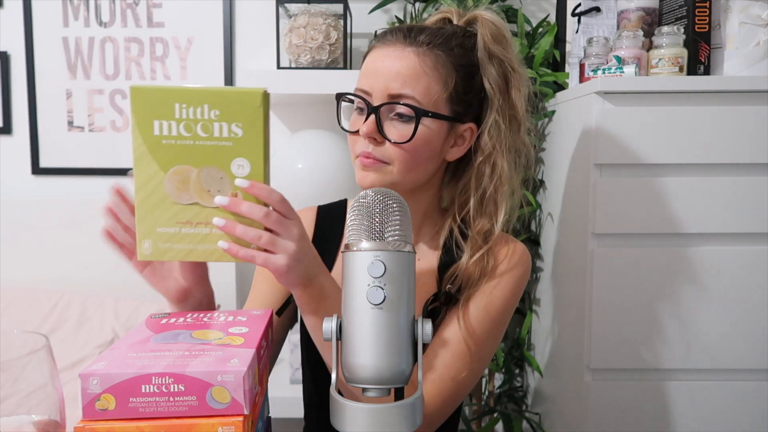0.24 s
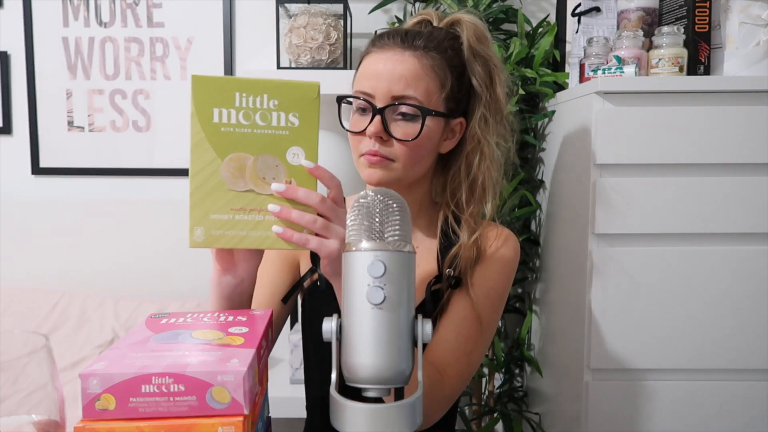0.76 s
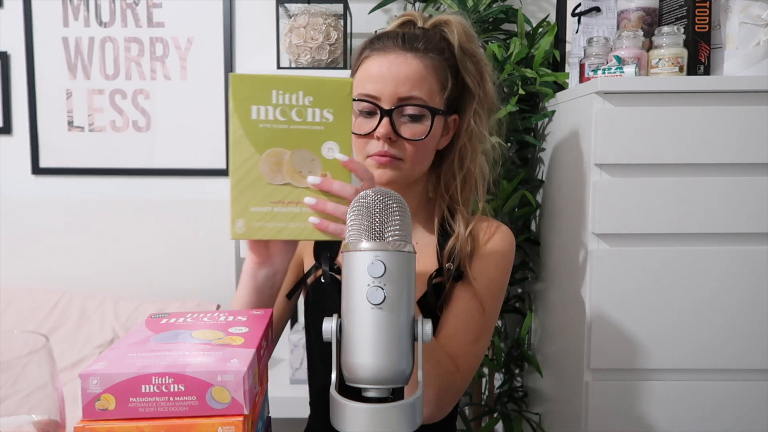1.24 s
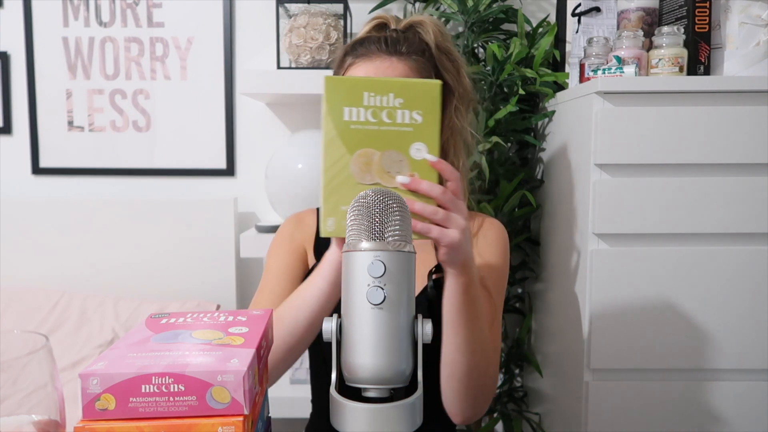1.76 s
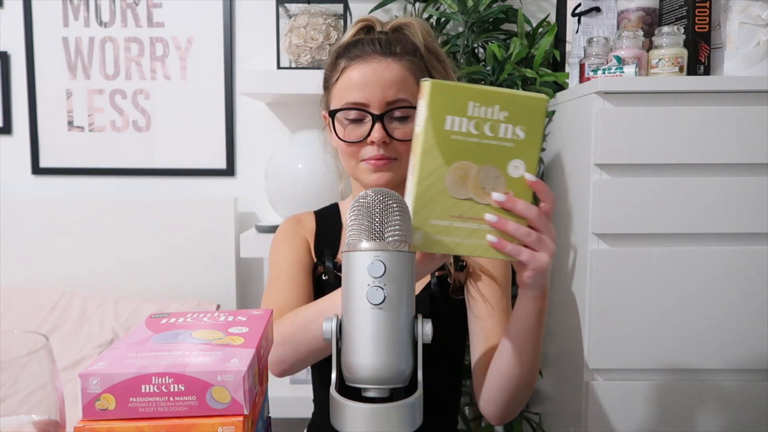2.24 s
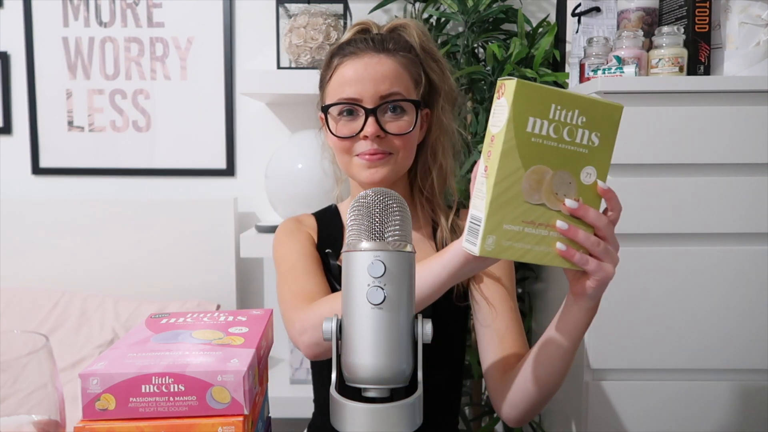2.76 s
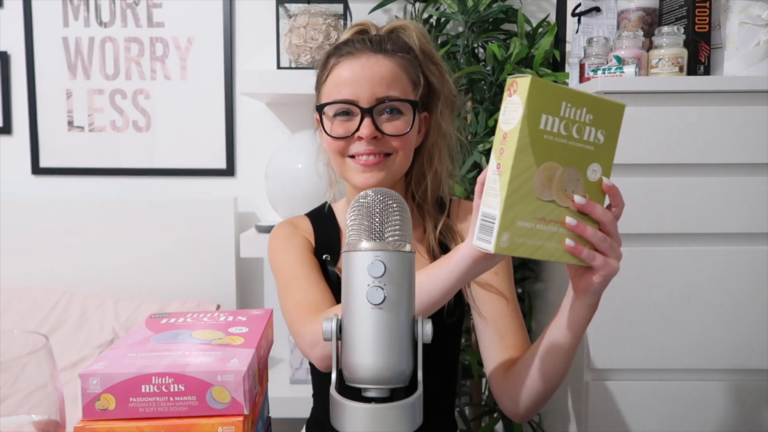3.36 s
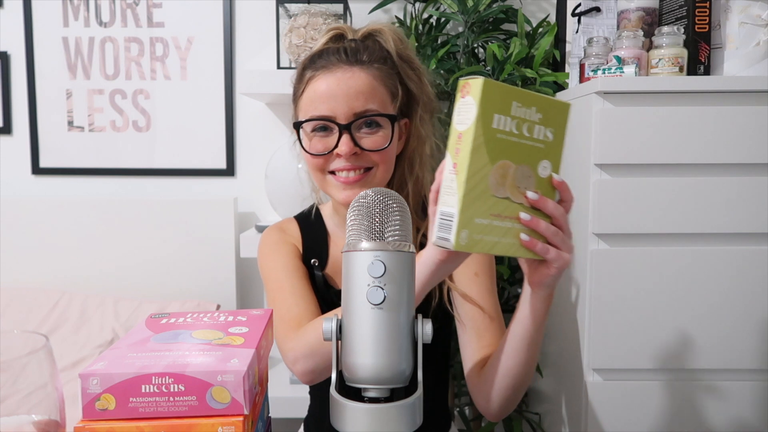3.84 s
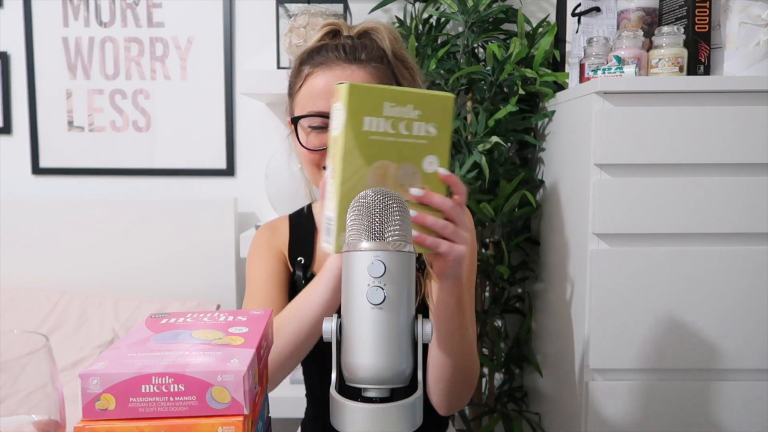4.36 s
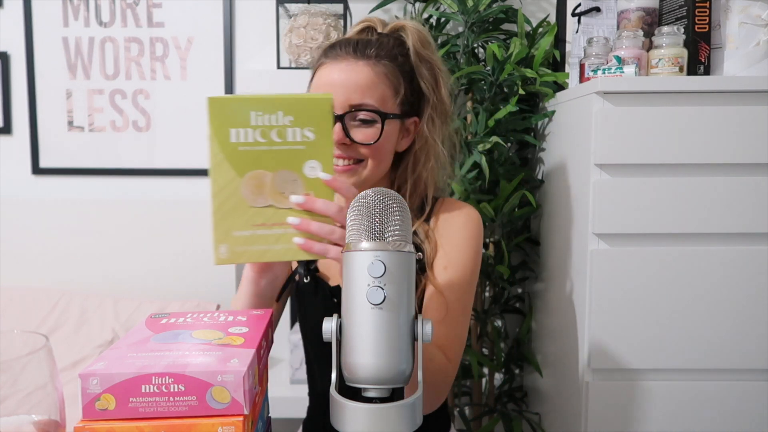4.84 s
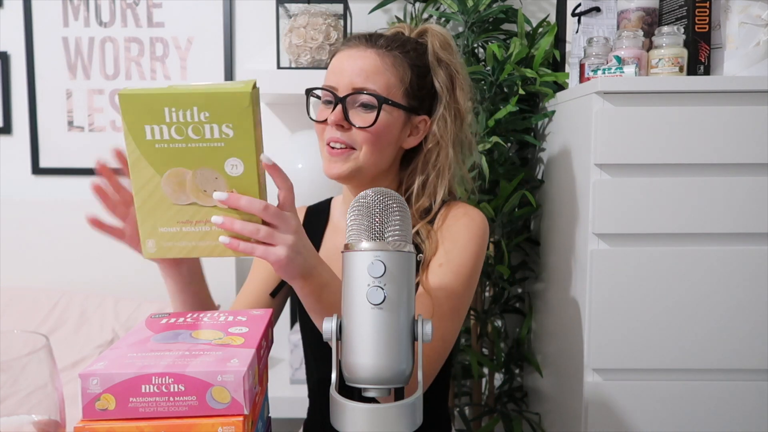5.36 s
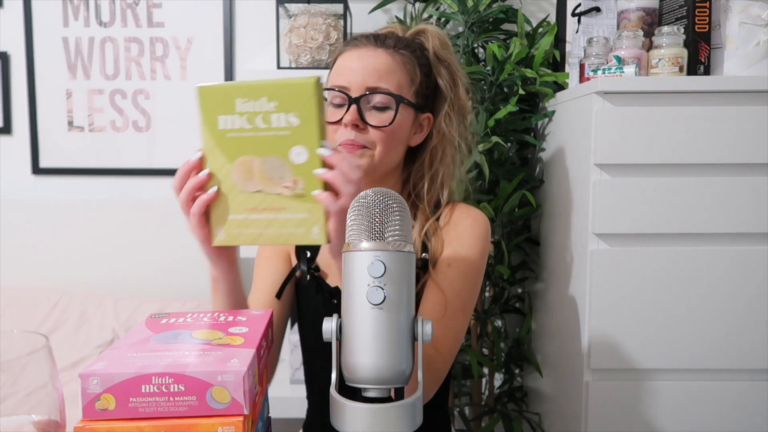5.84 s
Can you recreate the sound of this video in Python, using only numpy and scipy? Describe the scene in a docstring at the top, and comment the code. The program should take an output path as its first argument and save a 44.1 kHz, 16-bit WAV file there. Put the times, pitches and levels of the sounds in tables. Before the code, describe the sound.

Close-up nail tapping on a light cardboard box: faint handling first, then repeated rapid clicking rolls with short pauses, ending in soft shuffling.

```python
"""A small soft room, where long fingernails drum in quick rolls on a thin cardboard box near a microphone.
Each tap is a short noise tick over four families of decaying modes: face, edge, hollow and thump.
Before, between and after rolls the fingers shift their grip and rub the card: jerky noise, dull and bright.
Near echoes and a decaying noise tail make the room; air hiss, a faint hum and a low rumble lie under it.
"""
import sys
import numpy as np
from scipy import signal
from scipy.fft import rfft, irfft
from scipy.io import wavfile

SR = 44100
rng = np.random.default_rng(int(sys.argv[2]) if len(sys.argv) > 2 else 0)


def dump_mix(stems):
    """Bounce the given channels to the path in sys.argv[1] as a 16-bit WAV at rate SR."""
    frames = np.atleast_2d(stems).T  # one column per channel
    limited = np.clip(frames, -1, 1)  # hard clip at full scale
    pcm = np.round(limited * 32767).astype(np.int16)
    wavfile.write(sys.argv[1], SR, pcm)


N = 269451  # length in samples

# Nail taps and grip knocks: start_s, face_level_db, face_pitch_hz (nearest the struck spot),
# edge_level_db and hollow_level_db (both against the face ring), hollow_pitch_hz
BLOWS = [(0.013, -43, 650, -12, 1.5, 307), (0.121, -38.5, 730, -16, -5, 417), (0.16, -36, 610, 0, -21, 444),
         (0.224, -38.5, 1040, -16, -2, 458), (0.236, -31.5, 685, -5, -2.5, 377),
         (0.269, -42, 511, -5, -7, 468), (0.424, -41, 670, -9, -11, 439), (0.647, -44.5, 756, -19, -8, 401),
         (0.898, -21.5, 560, -2, -9.5, 441), (1.004, -39.5, 620, -26, -11, 334),
         (1.037, -16.5, 853, -3.5, -5, 412), (1.1, -10, 603, 0, -4.5, 393), (1.172, -12, 730, 0.5, -6, 315),
         (1.322, -33, 726, 2, 0.5, 398), (1.524, -23, 519, 5, 0.5, 347), (1.582, -14, 510, 1.5, -0.5, 409),
         (1.602, -7.5, 750, -2.5, -6, 331), (1.699, -18, 695, 3.5, -0.5, 420),
         (1.919, -40.5, 750, -23, -6, 406), (1.985, -35, 805, -12, -3.5, 339),
         (2.072, -14, 790, -6, -10, 242), (2.121, -8, 1150, -5.5, -8.5, 299),
         (2.197, -18, 953, 0.5, -2, 393), (2.546, -21, 795, -3.5, -5.5, 371),
         (2.633, -12, 775, -4, -5, 248), (2.678, -10, 930, -0.5, -2.5, 291),
         (2.765, -13.5, 870, -2.5, -6.5, 342), (2.844, -40, 844, -12, -16, 458),
         (3.001, -17.5, 770, 0, -4.5, 366), (3.107, -13.5, 820, -3, -3.5, 248),
         (3.186, -8.5, 1190, -2.5, -6, 253), (3.293, -13.5, 790, -0.5, -5.5, 326),
         (3.385, -35.5, 805, -2, -5, 439), (3.441, -40.5, 800, -11, -5, 355),
         (3.475, -29.5, 501, 4, 0, 479), (3.58, -15, 825, -3, -6, 242), (3.629, -10.5, 1350, -1, -3.5, 245),
         (3.699, -16, 773, 3.5, 0, 296), (3.917, -36, 810, -10, -14, 471),
         (3.952, -26.5, 501, 5, -3.5, 299), (4.067, -12, 920, -10, -9.5, 234),
         (4.131, -8.5, 935, -5.5, -7.5, 334), (4.217, -31.5, 895, -2, -5, 425),
         (4.238, -14.5, 1070, -1, -4, 310), (4.491, -41.5, 646, -3, -18, 433),
         (4.512, -25, 495, 5, -1, 334), (4.593, -12, 920, -3.5, -7, 347),
         (4.64, -10.5, 965, -0.5, -5.5, 250), (4.754, -20, 734, 3.5, 0.5, 318),
         (4.945, -39, 720, -16, -19, 398), (4.973, -28, 720, 4.5, -3, 315),
         (5.077, -14, 860, -3.5, -6, 393), (5.11, -10.5, 960, -2.5, -7.5, 304),
         (5.175, -16, 740, 3.5, 0.5, 347), (5.441, -35.5, 501, -1.5, -3.5, 420),
         (5.474, -30.5, 703, -7, -16, 433), (5.557, -46, 820, -19, 14, 350),
         (5.621, -28.5, 614, -6, -5, 468), (5.656, -24.5, 750, -6, -6.5, 345),
         (5.687, -12.5, 830, -5, -6, 412), (5.779, -35, 577, -2.5, 0, 450), (5.828, -34, 510, 0, 1.5, 479),
         (5.847, -28, 534, 2, -4, 471), (5.895, -34, 600, -5, -1.5, 436), (6.008, -43, 760, 8.5, -18, 425)]
# Modes of the box, one table a family: pitch_hz, relative_level_db, t60_s
THUMP_MODES = [(67, -8.5, 0.15), (100.3, 0.5, 0.082), (144.3, -7, 0.17)]
HOLLOW_MODES = [(184, -0.5, 0.03), (261.8, -21, 0.3), (250, -4.5, 0.047), (328, -9.5, 0.055),
                (409, 3, 0.016)]
FACE_MODES = [(563, -5.5, 0.12), (641, 3, 0.066), (716, 1.5, 0.08), (884, -31, 0.13), (859.4, 9.5, 0.048),
              (1070, -6, 0.0086), (1126, 11.5, 0.035), (1240, 9.5, 0.03)]
EDGE_MODES = [(1346, -2.5, 0.033), (1600, 0.5, 0.022), (1810, -9.5, 0.035), (1987, -18, 0.06),
              (2244, -2.5, 0.02), (2580, -4, 0.02)]
# Balance of a blow as the box travels and turns before the microphone: time_s,
# thump_db (against the hollow ring), tick_db (against the edge ring), treble_db (extra, for a 0 dB blow)
BOX_POSE = [(0, -7.5, -5, 2), (1.1, -12.5, -5.5, 28.5), (1.6, -13.5, -7.5, 25.5), (2.15, -18, -5, 24.5),
            (2.6, -10, -8, 22.5), (3.15, -10.5, -6, 24), (3.6, -9.5, -8.5, 25.5), (4.15, -9, -4, 24),
            (4.65, -11.5, -9, 22.5), (5.1, -17.5, -8.5, 27.5), (5.6, -14.5, -9.5, 25), (6.11, -9, -0.5, 51)]
# Colour of the nail tick: frequency_hz, relative_level_db (per Hz)
TICK_COLOUR = [(1500, -41), (2600, 15.5), (3300, 20), (4200, 16), (5500, 11.5), (7000, 6.5), (10000, -12.5),
               (13000, -13.5), (16000, -22), (17000, -14.5)]
# Tick returning from the nearest surfaces: delay_s, level_db (before the echo colour)
TICK_ECHOES = [(.0072, -10), (0.0132, -31.5)]
# Colour of those echoes: frequency_hz, gain_db
ECHO_COLOUR = [(2500, -19), (4500, 1), (6000, 9), (7500, 3), (11000, -5), (16000, -27)]
# Ring of the box returning from the walls: delay_s, level_db
WALL_ECHOES = [(0.022, -24), (0.028, -22), (.034, -27.5)]
# Early decay of the room tail: frequency_hz, t60_s
ROOM_DECAY = [(60, 0.52), (160, 0.15), (420, 0.33), (1100, 0.45), (2900, 0.29), (7700, 0.27),
              (16000, 0.065)]
# Level of the room tail: frequency_hz, gain_db
TAIL_COLOUR = [(35, -14), (80, -4), (260, -3.5), (900, -8.5), (2500, -7.5), (5000, 0.5), (10000, -0.5),
               (15700, -8)]
# Steep low-pass near 16 kHz, applied to the noises and room tails but not the direct ticks:
# frequency_hz, gain_db
STEEP_LOWPASS = [(15800, 0), (16100, -30)]
# Fingers sliding on the card: start_s, length_s, dull_rub_db, bright_hiss_db
STROKES = [(0, 0.14, -62.5, -68.5), (0.124, 0.075, -50, -65.5), (0.23, .03, -51, -67),
           (0.261, 0.042, -46, -63), (0.403, 0.032, -58.5, -70), (0.644, 0.1, -70, -66.5),
           (3.118, .15, -55, -53), (3.296, 0.18, -54, -64), (5.423, 0.024, -45, -80),
           (5.461, 0.057, -50, -62), (5.536, 0.048, -52.5, -88), (5.599, 0.015, -44, -58),
           (5.689, 0.06, -47, -53.5), (5.806, 0.071, -45, -63), (5.881, 0.094, -47.5, -68),
           (5.98, 0.029, -51, -58.5)]
# Colour of the dull rub heard through the box: frequency_hz, relative_level_db (per Hz)
RUB_COLOUR = [(88, -117), (150, -1), (233, -26), (434, -1.5), (1240, -11.5), (1430, -25), (1710, -10.5),
              (2600, -29.5), (3380, -29), (5720, -120)]
# Colour of the bright hiss at the card surface: frequency_hz, relative_level_db (per Hz)
HISS_COLOUR = [(1470, -27), (2150, -24), (2800, -17), (3700, -5), (6580, -1), (7740, -3.5), (8830, -3.5),
               (10300, -6), (15900, -21)]
# Colour of the steady air hiss: frequency_hz, relative_level_db (per Hz)
AIR_COLOUR = [(32, -25), (55, 3.5), (257, -6.5), (648, -4.5), (747, -5), (821, -8.5), (1710, -11),
              (2750, -26), (5740, -23.5), (7100, -29), (8790, -44), (10600, -42.5), (15900, -30)]
# Steady hum: pitch_hz, width_hz (at half amplitude), level_db
HUM_BAND = (162.7, 20, -68)
# Colour of the rumble: frequency_hz, relative_level_db (per Hz)
RUMBLE_COLOUR = [(8, -45), (20, 13), (40, 6.0), (52, -16), (100, -30.5)]
# Dip of the microphone housing: centre_hz, width_hz (centre to 1/e of the depth), gain_db
HOUSING_DIP = (8780, 910, -12.5)

EDGE_SPOT_HZ, EDGE_SCATTER = 1492, 0.14  # pitch that leads the edge ring; its relative spread by tap
TREBLE_PER_DB = 0.77  # dB of tick treble lost for each dB of a softer blow
# A softer blow lands more on the fingertip: dB of tick against the ring for each dB from LOUD_DB
LOUD_DB, TICK_PER_DB = -12, 0.1046
BLUR_OCTAVES = 0.28  # smoothing of the box colour in the room tail
SLIDE_RISE_S, SLIDE_T60_S = 0.02, 0.17
AIR_DB, RUMBLE_DB = -61.5, -62  # steady rms levels
JOLT_DB = -37  # swell of the rumble after a 0 dB blow, before its rise and decay shape it
JOLT_RISE_S, JOLT_T60_S = 0.021, 0.23
BAND_LIMIT_HZ = 16700


def taps():
    """Each blow excites the box modes and a nail tick, which return as echoes and a room tail."""
    out = np.zeros(N)
    for blow in BLOWS:
        start_s, level_db, edge_db = blow[0], blow[1], blow[3]
        pose_s, *balances = np.transpose(BOX_POSE)
        thump_db, tick_db, treble_db = (np.interp(start_s, pose_s, column) for column in balances)
        level = amp(level_db)
        sound = box_ring(blow, thump_db)
        tick_db += edge_db + TICK_PER_DB * (level_db - LOUD_DB)
        tick = amp(tick_db) * nail_tick(treble_db + TREBLE_PER_DB * level_db)
        for delay_s, echo_db in WALL_ECHOES:
            add(out, start_s + delay_s, level * amp(echo_db) * sound)
        add(sound, 0, tick)
        add(out, start_s, level * room_tail(sound))
        late_tick = np.roll(tick, 40)  # the echoes come 40 samples later than their listed delay
        for delay_s, echo_db in TICK_ECHOES:
            add(sound, delay_s, amp(echo_db) * coloured(late_tick, ECHO_COLOUR))
        add(out, start_s, level * sound)
    return out


def box_ring(blow, thump_db):
    """The struck card, its edges and the hollow inside each ring in their own family of modes."""
    _, _, face_hz, edge_db, hollow_db, hollow_hz = blow
    edge_hz = EDGE_SPOT_HZ * (1 + EDGE_SCATTER * rng.standard_normal())
    sound = ring(FACE_MODES, face_hz)
    sound += amp(edge_db) * ring(EDGE_MODES, edge_hz, rise_s=0.0002)
    sound += amp(hollow_db) * ring(HOLLOW_MODES, hollow_hz, rise_s=0.00022, focus_db=18.5)
    sound += amp(hollow_db + thump_db) * ring(THUMP_MODES, rise_s=0.0028)
    return sound


def ring(modes, spot_hz=None, rise_s=0.00012, spread_db=4.0, detune=0.042, focus_db=15):
    """Decaying sines of one mode family, peak 1; each blow weights and detunes them a little differently."""
    hz, level_db, t60_s = np.transpose(modes)[:, :, None]
    weight, shift = rng.standard_normal((2, len(modes), 1))
    if spot_hz:
        # modes near the spot's own pitch lead; focus_db is the loss per octave away
        level_db = level_db - focus_db * abs(np.log2(hz / spot_hz))
    t = np.arange(4096) / SR
    lag = np.arange(len(modes))[:, None] * 1.27  # radians, growing down the table
    envelope = amp(level_db + spread_db * weight - 60 * t / t60_s)
    waves = envelope * np.sin(2 * np.pi * hz * (1 + detune * shift) * t - lag)
    sound = waves.sum(0) * (1 - np.exp(-t / rise_s))
    return sound / abs(sound).max()


def nail_tick(treble_db):
    """The hard nail gives a very short burst of coloured noise, peak 1; treble_db tilts it above 7 kHz."""
    t = np.arange(1024) / SR
    tick = coloured(rng.standard_normal(1024), TICK_COLOUR)
    tick = coloured(tick, [(7000, 0), (10000, treble_db)])
    tick *= amp(-60 * t / 0.011) * (1 - np.exp(-t / 0.0003))  # t60 and rise in seconds
    return tick / abs(tick).max()


def room_tail(sound, start_s=0.0014, bend_db=5):
    """The walls hear the box from all sides: its modes blur to a smooth colour, each band dying at its speed."""
    real, imaginary = rng.standard_normal((2, 129, 240))  # bands by frames
    t = np.arange(240) * 64 / SR
    t60_s = read(ROOM_DECAY, np.fft.rfftfreq(256, 1 / SR))[:, None]
    late_db = -bend_db * (10 * t) ** 3  # the fall steepens, most of all after a tenth of a second
    bands = (real + 1j * imaginary) * amp(-60 * t / t60_s + late_db) / np.sqrt(t60_s)
    tail = signal.istft(bands, SR, nperseg=256, noverlap=192)[1]
    tail *= 1 - np.exp(-(np.arange(len(tail)) / SR / start_s) ** 2)  # the tail builds up
    # the blow's own spectrum, smoothed over a log-frequency grid, colours the tail
    power = abs(rfft(sound)) ** 2
    fine_hz = np.fft.rfftfreq(len(sound), 1 / SR)
    grid_hz = np.geomspace(30, SR / 2, 80)
    near = np.exp(-(np.log2((fine_hz + 1) / grid_hz[:, None]) / BLUR_OCTAVES) ** 2)
    smooth_db = 10 * np.log10(near @ power / near.sum(1))
    tail = coloured(tail / np.linalg.norm(tail), np.transpose([grid_hz, smooth_db]))
    tail = coloured(coloured(tail, TAIL_COLOUR), STEEP_LOWPASS)
    return tail * signal.windows.tukey(2 * len(tail), 0.5)[len(tail):]  # fade-out


def slides(slips_per_s=400, size_db=5):
    """Skin slips on the card in many tiny jerks, heard dull through the box and bright at the surface."""
    slips = rng.random(N) < slips_per_s / SR
    sizes = amp(size_db * np.minimum(rng.exponential(1, N), 3))
    jerks = evened(slips * sizes * rng.choice([-1, 1], N))
    rub = evened(coloured(0.8 * jerks + rng.standard_normal(N), RUB_COLOUR))
    hiss = evened(coloured(0.54 * jerks + rng.standard_normal(N), HISS_COLOUR))
    t = np.arange(SR // 2) / SR
    dull, bright = np.zeros(N), np.zeros(N)
    for start_s, length_s, rub_db, hiss_db in STROKES:
        fade = amp(-60 * np.maximum(t - length_s, 0) / SLIDE_T60_S)
        stroke = np.minimum(t / SLIDE_RISE_S, 1) * fade
        add(dull, start_s, amp(rub_db) * stroke)
        add(bright, start_s, amp(hiss_db) * stroke)
    return dull * rub + bright * hiss


def rumble():
    """Low noise that is steady but swells after each blow."""
    t, jolts = np.arange(SR) / SR, np.zeros(N)
    for start_s, blow_db, *_ in BLOWS:
        swell = amp(blow_db + JOLT_DB - 60 * t / JOLT_T60_S) * (1 - np.exp(-t / JOLT_RISE_S))
        add(jolts, start_s, swell)
    return (amp(RUMBLE_DB) + jolts) * evened(coloured(rng.standard_normal(N), RUMBLE_COLOUR))


def hum():
    """Noise narrowed to a resonance-shaped band, so the tone wavers."""
    hz, width_hz, level_db = HUM_BAND
    offset = 2 * (np.fft.rfftfreq(N, 1 / SR) - hz) / width_hz
    tone = irfft(rfft(rng.standard_normal(N)) / (1 + offset ** 2), N)
    return amp(level_db) * evened(tone)


def air():
    """Steady coloured noise: the hiss of the quiet room."""
    return amp(AIR_DB) * evened(coloured(rng.standard_normal(N), AIR_COLOUR))


def amp(db):
    """Gain of a level in dB."""
    return 10 ** (np.asarray(db) / 20)


def evened(x):
    """Scales to rms 1."""
    return x / np.sqrt(np.mean(x ** 2) + 1e-20)


def read(points, hz):
    """Value of a spectrum table on a log-frequency axis."""
    f, value = np.transpose(points)
    return np.interp(np.log(hz + 1), np.log(f + 1), value)


def coloured(x, points):
    """Filters x by the gains of a spectrum table."""
    gain = amp(read(points, np.fft.rfftfreq(len(x), 1 / SR)))
    return irfft(rfft(x) * gain, len(x))


def add(mix, start_s, sound):
    """Mixes a sound in at its start time."""
    part = mix[round(start_s * SR):][:len(sound)]
    part += sound[:len(part)]


def scene():
    """The drummed and rubbed box in the room over its background."""
    noises = slides() + rumble() + hum() + air()
    return (taps() + coloured(noises, STEEP_LOWPASS))[None]


def record(dry):
    """The dip of the microphone housing, then the band limit."""
    hz, width_hz, dip_db = HOUSING_DIP
    offset = (np.fft.rfftfreq(N, 1 / SR) - hz) / width_hz
    dip = 1 - (1 - amp(dip_db)) * np.exp(-offset ** 2)
    dipped = irfft(rfft(dry) * dip, N)
    lowpass = signal.firwin(511, BAND_LIMIT_HZ, window=("kaiser", 9), fs=SR)
    return signal.oaconvolve(dipped, lowpass[None], "same")


dry = scene()
out = record(dry)
dump_mix(out)
```